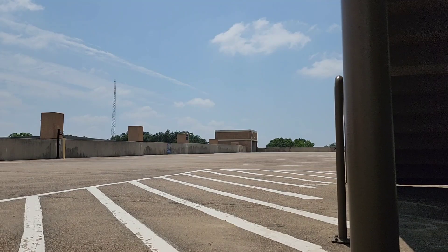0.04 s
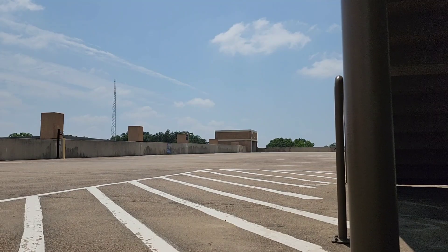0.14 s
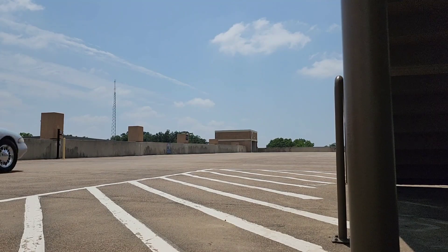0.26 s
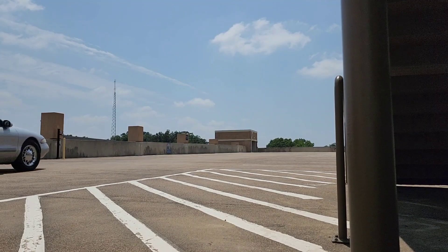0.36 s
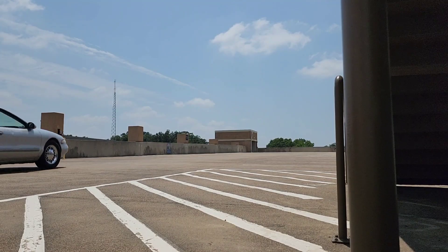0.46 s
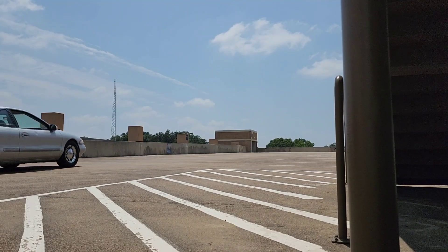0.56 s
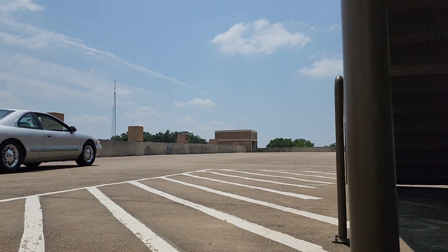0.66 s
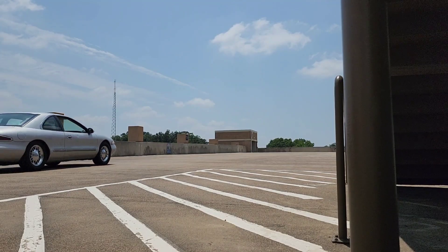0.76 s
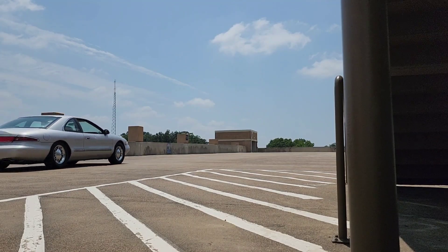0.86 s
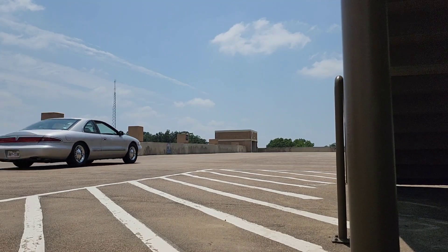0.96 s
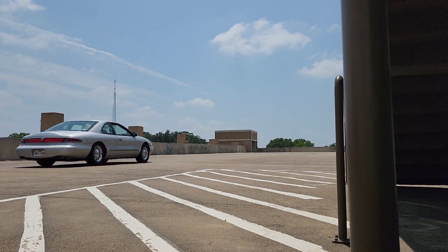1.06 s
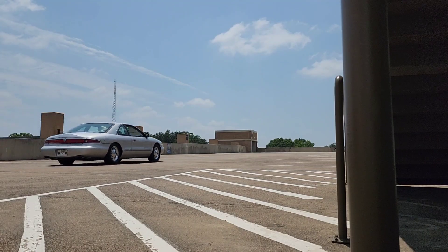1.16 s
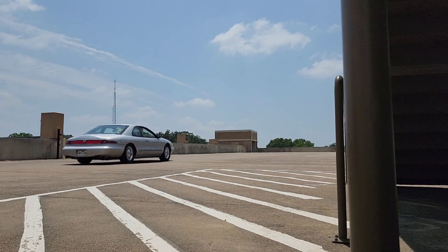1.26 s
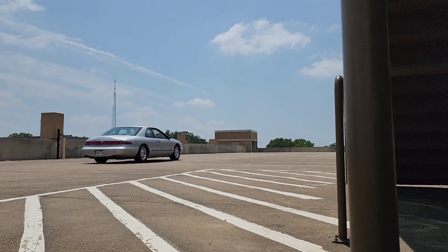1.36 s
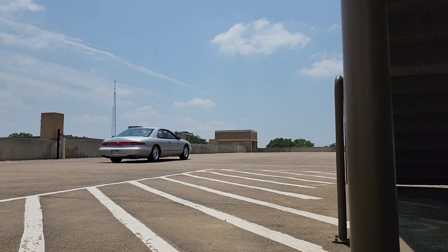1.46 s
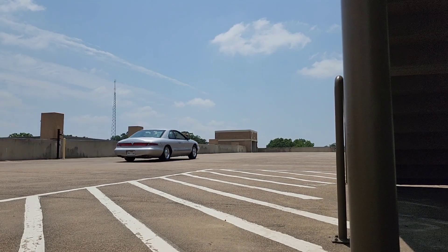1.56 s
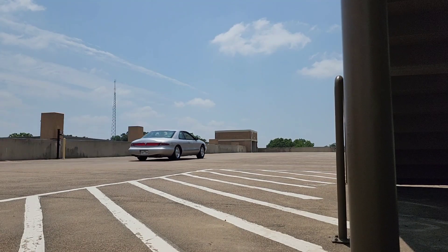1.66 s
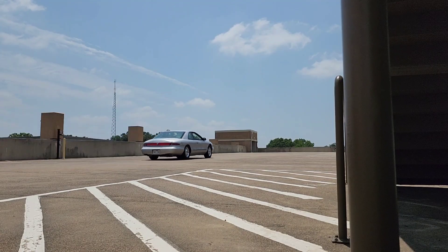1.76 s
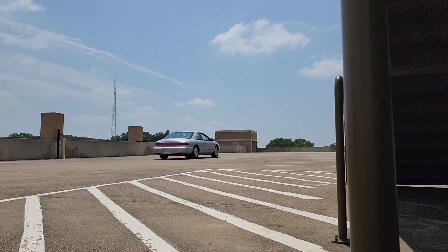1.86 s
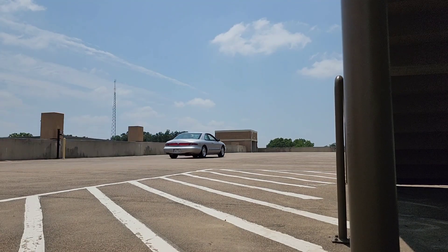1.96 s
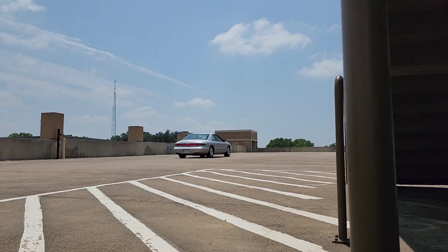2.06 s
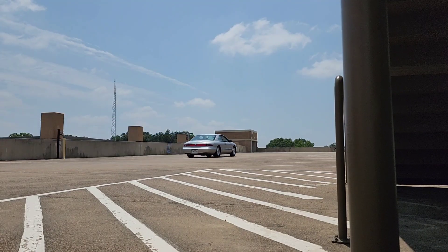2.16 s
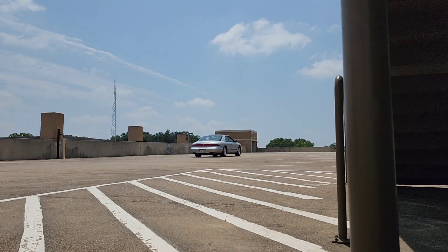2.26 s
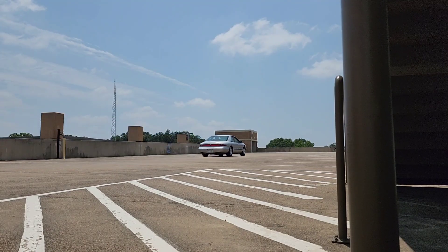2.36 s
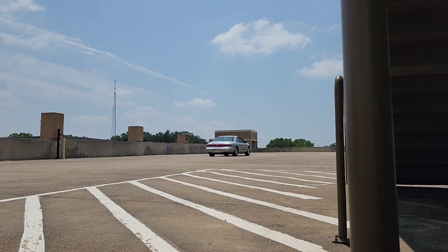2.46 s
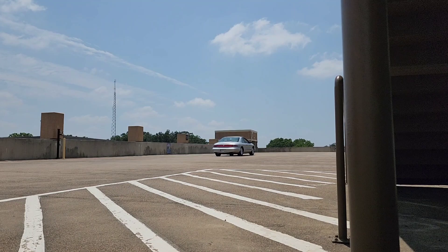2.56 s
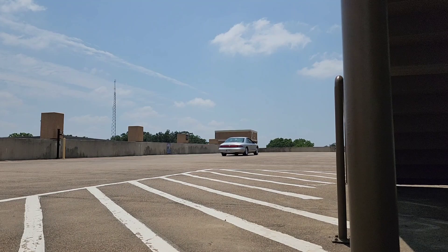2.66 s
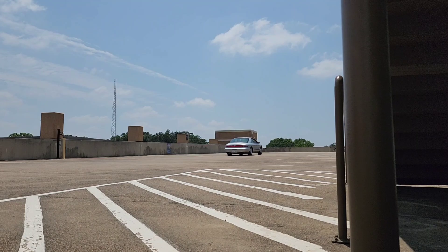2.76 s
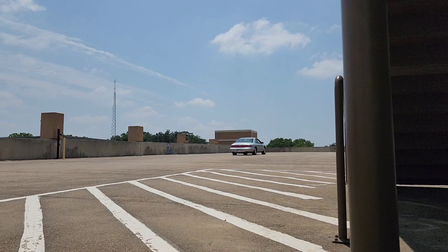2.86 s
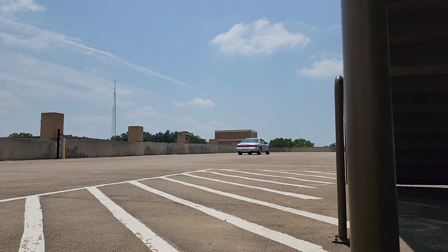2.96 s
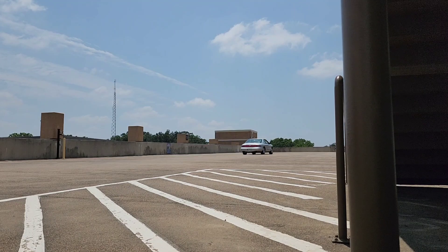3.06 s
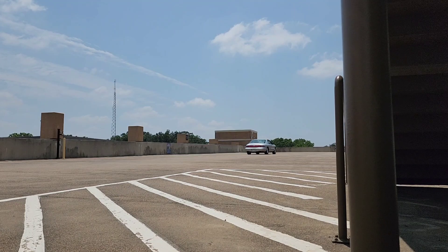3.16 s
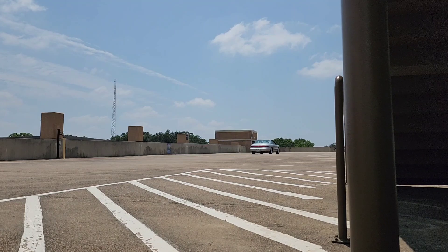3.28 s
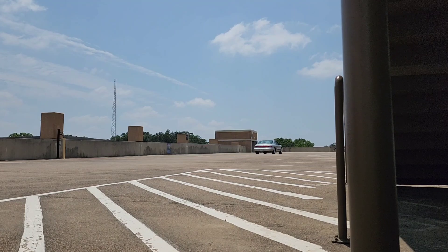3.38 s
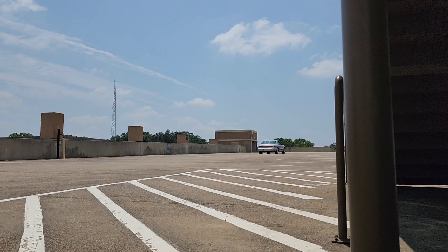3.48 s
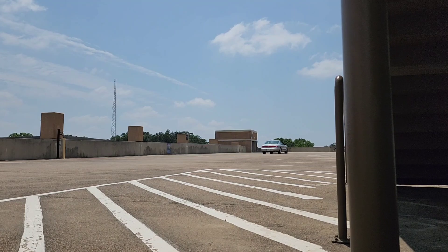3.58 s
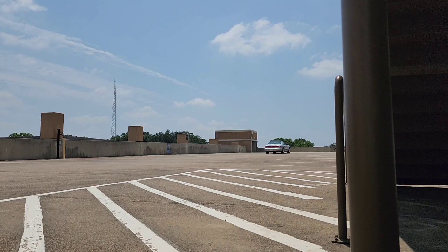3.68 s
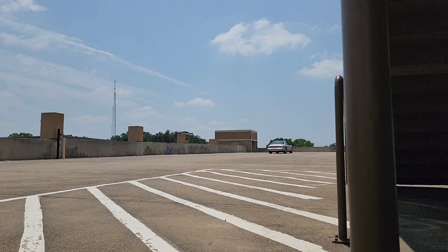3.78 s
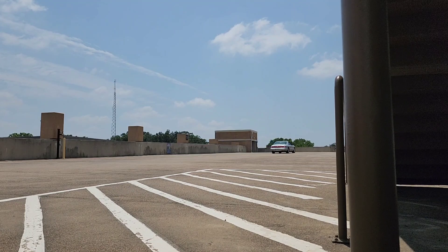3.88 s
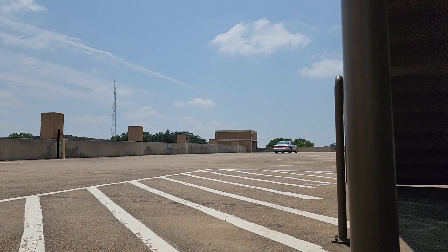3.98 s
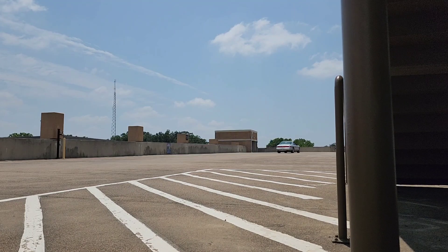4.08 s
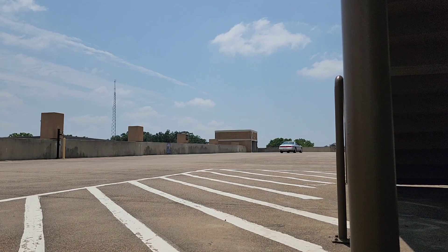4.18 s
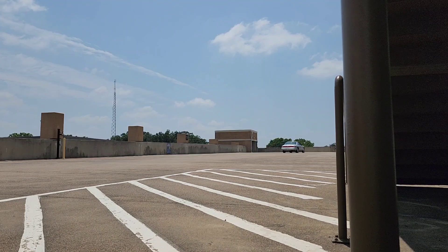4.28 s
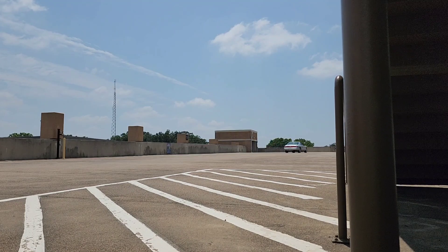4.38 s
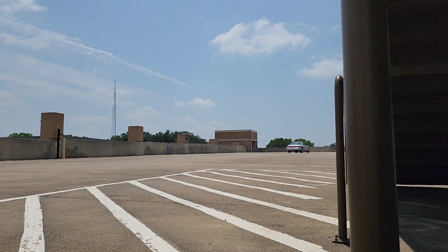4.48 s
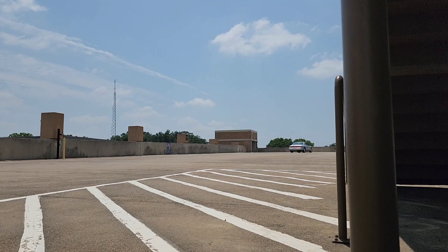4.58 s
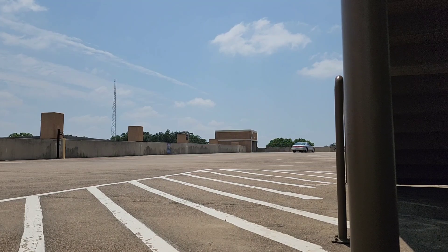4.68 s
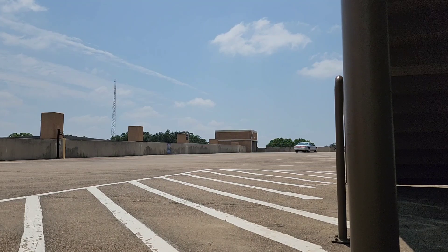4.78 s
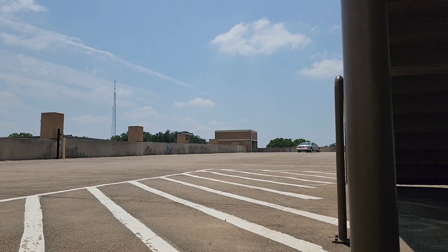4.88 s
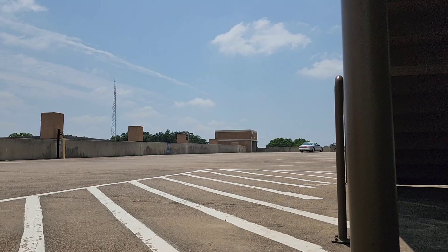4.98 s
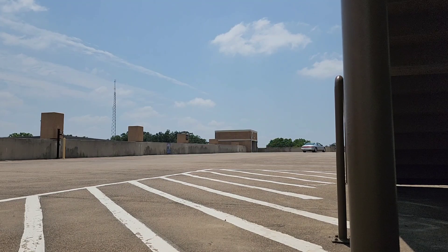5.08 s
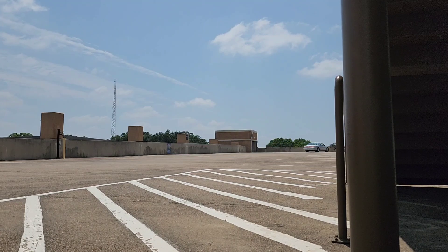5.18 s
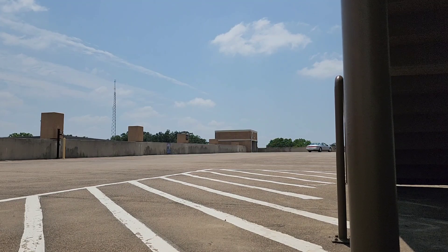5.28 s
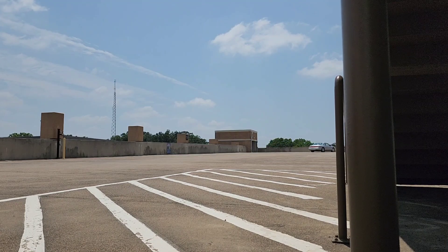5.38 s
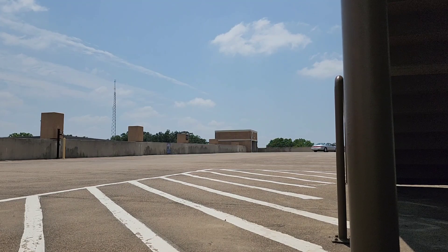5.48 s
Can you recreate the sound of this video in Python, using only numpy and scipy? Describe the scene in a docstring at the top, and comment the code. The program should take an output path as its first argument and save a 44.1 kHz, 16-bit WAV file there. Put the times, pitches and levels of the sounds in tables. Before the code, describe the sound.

A big-engined car accelerates past from the left with a throaty, booming roar, then eases off and fades away across an open concrete deck.

```python
"""A large V8 car pulls away across an open concrete deck, its revs rising, with small bright ticks from stones.
Each firing adds to a booming tone, its overtones and a rasp; noise in puffs makes the roar, steadier noise the hiss.
Early gusts add low rumbling noise that differs at the left and right microphones, and a wall answers on the right.
The driver lifts off, the revs fall and the car rolls away, fading and losing its top treble.
Town noise runs throughout; late on, a wavering low hum comes up and a far bird chips in short sliding whistles."""
import sys
import numpy as np
from scipy import signal
from scipy.fft import rfft, irfft, next_fast_len
from scipy.io import wavfile
from scipy.ndimage import uniform_filter1d, map_coordinates

SR = 44100
rng = np.random.default_rng(int(sys.argv[2]) if len(sys.argv) > 2 else 0)


def to_wav(sig):
    """Store sig (one row per channel, or 1-D mono) as 16-bit WAV at the path in sys.argv[1].

    Samples outside -1..1 are clipped; the rate is SR.
    """
    pcm = np.clip(np.atleast_2d(sig), -1, 1) * 32767
    pcm = np.round(pcm).astype(np.int16)
    wavfile.write(sys.argv[1], SR, pcm.T)  # frames by channels


N = 243851  # length in samples

# How often the engine fires: time_s, firing_rate_hz
FIRING_RATE = [(0, 133), (.5, 148.6), (.9, 165.1), (1.4, 181.8), (1.8, 190.4), (1.95, 189.5), (2.1, 181.8),
               (2.3, 175.5), (2.42, 170.4), (2.5, 160.6), (2.7, 151.4), (2.95, 147.3), (3.05, 149),
               (3.12, 143), (3.15, 132.5), (3.45, 120), (3.75, 115.9), (4.05, 110.8), (5.53, 90.1)]
# Firing tone, swelling and fading as echoes add and cancel: time_s, level_db
BOOM = [(0, -35), (.031, -19), (.108, -19.5), (.122, -22.5), (.137, -32.5), (.152, -24), (.172, -17.5),
        (.186, -26.5), (.197, -16.5), (.212, -13), (.224, -27), (.24, -17), (.258, -26), (.27, -30),
        (.285, -30.5), (.3, -32), (.32, -29), (.44, -25), (.64, -31), (.73, -22.5), (.82, -25.5),
        (.98, -21), (1.11, -22.5), (1.24, -16), (1.5, -19), (1.56, -15), (1.8, -25), (2.07, -20),
        (2.2, -24.5), (2.245, -39), (2.3, -20), (2.41, -37), (2.46, -25), (2.61, -39), (2.71, -31),
        (2.81, -45.5), (2.97, -33), (3.1, -47.5), (3.16, -28.5), (3.2, -35.5), (3.25, -25.5), (3.29, -29.5),
        (3.317, -47.5), (3.393, -30), (3.55, -45), (3.76, -36.5), (3.83, -43), (3.97, -44.5), (4.15, -55.5),
        (5.53, -91)]
# Multiples 2 to 5 of the firing rate: time_s, second_db, third_db, fourth_db, fifth_db
OVERTONES = [(0, -52, -46, -40, -47), (.2, -47, -37.5, -51, -32.5), (.33, -65.5, -37, -50, -35.5),
             (.48, -57, -47, -46, -35), (.55, -31.5, -49, -47, -40), (.65, -32, -45, -40, -33),
             (.72, -40.5, -33, -39, -53.5), (.85, -31.5, -32.5, -33, -40.5), (.97, -30.5, -49, -35, -38.5),
             (1.1, -33.5, -45.5, -25.5, -33.5), (1.21, -22.5, -43, -30, -45.5),
             (1.3, -29.5, -28.5, -24.5, -47), (1.41, -24.5, -33.5, -26, -43),
             (1.5, -35.5, -43.5, -37.5, -48), (1.7, -27, -46.5, -29, -53), (1.8, -34.5, -42, -39.5, -60),
             (2.0, -30, -39.5, -40, -54), (2.08, -31, -41, -31, -45), (2.2, -43.5, -41, -38, -44),
             (2.28, -26.5, -43, -25, -37), (2.33, -35.5, -37, -39.5, -43), (2.39, -28, -40.5, -41, -51),
             (2.45, -31, -38, -53, -52), (2.5, -40, -44, -48, -52.5), (2.7, -46, -57.5, -48, -48.5),
             (2.92, -43.5, -39, -58, -48), (3.04, -36, -61, -63, -52), (3.1, -43.5, -53, -58, -55),
             (3.14, -37.5, -50.5, -62, -50.5), (3.2, -54.5, -41.5, -62.5, -57),
             (3.5, -50, -57, -55.5, -55.5), (4, -62.5, -77, -75, -77)]
# Echoes break up the upper tones: time_s, phase_scatter_rad (for the third multiple)
PHASE_SCATTER = [(0, .6), (.45, .3), (.7, .12), (1.4, .15), (1.8, .45), (2.4, .4), (5.53, .6)]
# Strongest parts of the uneven beat: multiple_of_firing_rate, gain_db
BURBLE = [(.5, 2.5), (0.624, 3.5), (0.749, -6.5), (1.375, -11)]
# Strength of the whole uneven beat: time_s, gain_db
BURBLE_GAIN = [(0, -44.5), (.3, -47.5), (.55, -40.5), (.8, -36.5), (.95, -42), (1.2, -35), (1.4, -49.5),
               (1.75, -54.5), (1.95, -52), (2.2, -83), (2.9, -49.5), (3.1, -58), (3.6, -57.5)]
# Silencer resonances that lift a burble tone passing through: pitch_hz, half_width_hz, lift_db
SILENCER_LIFT = [(94, 8.9, 5.5), (189.2, 14, 25), (260.3, 9.8, 31)]
# Bite of the exhaust as the driver presses and lifts: time_s, gain_db
THROTTLE = [(0, -3), (.5, -1), (.8, 2), (1.4, 2), (2.2, 0), (2.5, -2), (2.9, -5), (3.3, -12), (5.53, -30)]
# Push of each cylinder above or below the mean: push (no unit)
CYLINDERS = [1, -.7, .6, -.3, .1, -.2, -.7, .2]
# Random part of each push: time_s, spread (no unit)
CHANCE_PUSH = [(0, .55), (.45, .35), (.6, .22), (1.4, .22), (1.6, .45), (2.5, .4), (5.53, .5)]
# Tailpipe tones rung by each firing: pitch_hz, width_hz, gain_db
TAILPIPE = [(258, 57.6, -4.5), (421, 113, -5.5), (609, 110, -1), (728, 130, -0.5), (860, 142.4, -4.5),
            (1055, 207, -14.5)]
# Short ringing bursts in the exhaust roar: start_s, start_gain_db, pitch_hz
RING_BURSTS = [(0.104, -23.5, 713), (0.166, -17.5, 410), (0.822, -24.5, 657), (0.872, -23, 606),
               (0.969, -25.5, 705), (1.138, -15, 713), (1.185, -10.5, 667), (1.837, -27, 604),
               (2.137, -13, 700), (2.243, -13, 718), (2.272, -15, 736), (2.289, -12.5, 428),
               (2.617, -35, 552), (2.638, -27.5, 870), (2.855, -25, 756), (3.153, -26, 693),
               (3.238, -34, 403), (3.303, -30.5, 680), (3.371, -28.5, 710)]
# The car's noise before each part's own trim: time_s, exhaust_roar_db, tyre_db, hiss_db
CAR_LEVELS = [(0, -29, -42, -40.5), (.21, -23, -32.5, -40), (.29, -28.5, -36.5, -42), (.71, -27, -41, -40),
              (1.26, -20.5, -32.5, -43), (1.42, -28, -36, -45), (2.3, -27.5, -39.5, -50),
              (2.59, -30.5, -44, -56), (2.99, -30, -49, -60), (3.11, -37, -49, -59),
              (3.71, -42, -49, -65.5), (3.95, -45.5, -49.5, -68), (4.12, -43.5, -51.5, -71.5),
              (4.22, -47, -52.5, -69.5), (4.32, -46, -52, -76.5), (4.6, -52, -52.5, -71.5),
              (4.95, -55.5, -58.5, -79), (5.53, -59.5, -65, -86)]
# Tone colour of the exhaust roar: pitch_hz, level_db_per_hz
PIPE_COLOUR = [(20, -68), (100, -7), (160, 5), (220, 0.5), (300, -10.5), (500, -4), (650, -2.5),
               (850, -7.5), (1100, -16.5), (1500, -22), (3000, -55.5), (9000, -120)]
# Silencer and deck resonances: pitch_hz, half_width_hz, gain_db
DRONE = [(100, 29, 3.5), (236, 110, -1), (257.4, 8.4, 2.5), (262, 4.7, -17), (415.3, 28, 6), (583, 22, -9),
         (749, 10.2, 2.5)]
# Strength of those resonances together: time_s, level_db
DRONE_LEVEL = [(0, -55), (.3, -45), (1, -42), (2.1, -36.5), (2.42, -38.5), (2.48, -32), (2.6, -39),
               (2.8, -36), (3, -37), (3.15, -46.5), (3.5, -60.5), (3.8, -68), (4.1, -59.5), (4.5, -62),
               (5.53, -75)]
# Patchiness of roar and tyres, evener when far: time_s, depth_db
PATCH_DEPTH = [(0, 2), (3, 2), (3.8, 1.6)]
# Tone colour of the hiss: pitch_hz, level_db_per_hz
HISS_COLOUR = [(1500, 2.5), (2400, 3), (3000, 0.5), (3600, -1.5), (5000, -8.5), (6200, -8.5), (8300, -9),
               (9800, -18), (14400, -19.5), (15700, -25)]
# Tone colour of the tyres: pitch_hz, level_db_per_hz
TYRE_COLOUR = [(400, -48), (900, 8), (1200, 4), (1450, 3), (1650, -2.5), (1820, -2.5), (2070, -5.5),
               (2200, -22), (2400, -7.5), (3000, -38.5), (6000, -120)]
# Strength of the narrow whistling bands: time_s, gain_db
WHINE_GAIN = [(0, -48), (.1, -50), (.19, -39.5), (.3, -50), (.4, -47), (.55, -45.5), (1.3, -51), (3, -84)]
# Those bands one by one: pitch_hz, gain_db
WHINE_BANDS = [(1800, -3.5), (2050, -9), (2350, -12.5)]
# Stones under the tyres: start_s, start_gain_db, pitch_hz, half_width_hz
GRIT = [(.334, -33, 5700, 1200), (.846, -38, 9500, 5500), (.86, -44, 11000, 5000), (.979, -42, 4000, 2000),
        (3.305, -55, 3200, 1200)]
# Direction of the car: time_s, left_lead_samples (how far the left side leads)
BEARING = [(0, 17), (.5, 11), (1, 8), (1.5, 4), (2.2, 0), (3.5, -3), (5.53, -5)]
# Wind gusts: peak_s, gain_db, half_length_s, left_over_right_db
GUSTS = [(0.102, -43, 0.059, -1.5), (0.195, -31.5, 0.044, -4.5), (0.249, -25.5, 0.013, -5.5),
         (1.162, -21.5, 0.036, -1), (1.234, -23, 0.046, 10.5), (1.628, -34, 0.048, -1),
         (3.152, -40.5, 0.041, -2), (5.271, -52.5, 0.04, 7)]
# Tone colour of the wind: pitch_hz, level_db_per_hz
WIND_COLOUR = [(15, -28.5), (30, -14.5), (50, -7), (80, -6.5), (150, -6), (230, -20.5), (300, -14.5),
               (600, -45), (2000, -120)]
# Tone colour of the town: pitch_hz, level_db_per_hz
TOWN_COLOUR = [(15, -35), (25, -6), (70, -1.5), (110, -5), (170, -15), (240, -11), (340, -20), (700, -27),
               (1700, -29), (2300, -37), (2700, -43.5), (3900, -41.5), (4400, -37.5), (4800, -47.5),
               (8300, -54), (9200, -73.5), (15700, -81.5)]
# How alike the town is on the two sides: pitch_hz, likeness (1 is the same)
TOWN_LIKENESS = [(60, 0.99), (180, 0.98), (550, 1), (900, 0.76), (1300, .35), (2000, .2), (4970, 0.063),
                 (15000, 0.46)]
# Low wavering note far off: time_s, pitch_hz, level_db
HUM = [(3.7, 71.34, -62.5), (4.0, 72.2, -41), (4.15, 69.17, -46.5), (4.4, 78.03, -41.5), (4.55, 81.06, -54),
       (4.8, 85.25, -51), (5.05, 85.6, -42), (5.16, 79, -57), (5.2, 50.4, -47), (5.3, 57, -49),
       (5.53, 79.7, -41.5)]
# Bird chips: start_s, gain_db, start_pitch_hz, end_pitch_hz, length_s
BIRD = [(5.081, -59, 6790, 5260, 0.0131), (5.136, -53, 6620, 5120, 0.014), (5.118, -70, 6250, 6200, .018),
        (5.146, -68, 5000, 4300, .008), (5.208, -67, 5755, 5400, 0.01), (5.254, -72, 5340, 5440, .016),
        (5.3, -69.5, 5600, 5310, .02), (5.351, -61, 5630, 6010, 0.011), (5.367, -63, 5730, 5370, .012),
        (5.376, -70, 5270, 4750, .009), (5.455, -71, 7880, 7380, 0.0091), (5.473, -75, 6465, 6080, 0.0073)]
# Stereo spread: pitch_hz, side_over_middle_db
WIDEN = [(300, 0), (700, -0.5), (1100, 1.5), (1500, 4.5), (2200, 1.5), (3500, 0)]
# Tone balance between the sides: pitch_hz, left_over_right_db
SIDE_TILT = [(100, .2), (700, .8), (1300, -2), (4000, -2), (8000, -5), (15000, -2.5)]

FLUTTER_DB, FLUTTER_PER_S = 2, 20  # most tones swell and fade on their own
MEAN_PUSH = .42  # mean push of a firing, no unit
ECHO_DB = 0  # the deck's answer to the pushes, over the direct ones
DIP_S, DIP_DEPTH = .009, .62  # the level dips briefly before each ringing burst
BREEZE_DB, BREEZE_DB_PER_S = -29.5, -7  # wind between the gusts, dying down
TOWN_DB = -41.5
TOP_HZ = 15700  # upper band limit


def amp(db):
    """Turns decibels into a plain gain."""
    return 10 ** (np.asarray(db) / 20)


def unit(x):
    """Scales a sound to an average (rms) strength of 1."""
    return x / np.sqrt(np.mean(x ** 2) + 1e-20)


def along(points, hz):
    """Reads a pitch table between its points, on a log pitch axis."""
    pitch_hz, value = np.transpose(points)
    return np.interp(np.log(hz + 1), np.log(pitch_hz + 1), value)


def curves(rows):
    """Draws each column after the time as a curve with one value per sample."""
    time_s, *columns = np.transpose(rows)
    return [np.interp(np.arange(N) / SR, time_s, column) for column in columns]


def wobble(rate):
    """A smooth random curve with the given number of random knots a second."""
    steps = np.arange(0, N + 32, 32)
    knots = rng.standard_normal(N // 100)
    return np.interp(np.arange(N), steps, map_coordinates(knots, [steps * rate / SR]))


def filtered(x, response):
    """Shapes a sound by multiplying its spectrum by a response to pitch."""
    m = next_fast_len(N + SR // 2)
    return irfft(rfft(x, m) * response(np.fft.rfftfreq(m, 1 / SR)), m)[..., :N]


def coloured(x, spectrum):
    """Gives a sound a tone colour from a table, at rms 1."""
    return unit(filtered(x, lambda hz: amp(along(spectrum, hz))))


def late(x, samples):
    """Delays a sound by a fixed or moving number of samples."""
    return map_coordinates(x, [np.arange(N) - samples], order=3, mode="nearest")


def smeared(x):
    """Blurs a sound into many close echoes, as off rough concrete, within 50 ms."""
    echoes = rng.standard_normal(SR // 20) * np.hanning(SR // 20)
    return signal.fftconvolve(x, echoes / np.linalg.norm(echoes))[:N]


def patchy(x):
    """Makes noise louder or softer at random in patches some 200 Hz by 80 ms."""
    _, time_s, spectrum = signal.stft(x, SR, nperseg=512)
    random_field = rng.standard_normal(spectrum.shape[1:])
    field = uniform_filter1d(uniform_filter1d(random_field, 2, 0), 14, 1)
    depth_db = np.interp(time_s, *np.transpose(PATCH_DEPTH))
    return signal.istft(spectrum * amp(depth_db * unit(field)), nperseg=512)[1][:, :N]


def car():
    """Direct sound from the car's direction, a wall's answer, and scattered sound unlike on the two sides."""
    turns = 2 * np.pi * np.cumsum(curves(FIRING_RATE)[0]) / SR  # firing phase, rad
    roar_db, tyre_db, hiss_db = curves(CAR_LEVELS)
    noise, *scattered = exhaust_roar(turns, roar_db) + hiss(turns, tyre_db, hiss_db)
    tones = exhaust_tones(turns, roar_db)
    upper = lambda hz: hz ** 4 / (hz ** 4 + 330 ** 4)

    wall = amp(-2.0) * filtered(smeared(tones + noise), lambda hz: hz ** 2 / (hz ** 2 + 450 ** 2))
    dip_gain = level_dips()
    bass_tones = filtered(tones, lambda hz: 1 - upper(hz))
    direct = dip_gain * (noise + filtered(tones, upper)) + bass_tones + ring_bursts()
    scattered = filtered(np.array(scattered), lambda hz: hz / (hz + 500))
    scattered = np.sqrt(dip_gain) * amp(4.5) * scattered
    # Tones crossing the deck sideways, opposite on the two sides
    across = amp(-7.5) * filtered(smeared(tones), lambda hz: hz ** 2 / (hz ** 2 + 130 ** 2))

    left = direct + late(wall, 21) + across  # the wall is heard on the right first
    # The bass shows no direction, so only the upper part is shifted in time
    shift = filtered(late(direct, curves(BEARING)[0]) - direct, upper)
    right = direct + shift + wall - across
    return np.array([left, right]) + scattered + whine() + grit()


def exhaust_tones(turns, roar_db):
    """Regular firings make a tone and overtones; unequal cylinders add a weaker, unsteady beat and a rasp."""
    tone = lambda k, db, phase=0: np.sqrt(2) * amp(db) * np.cos(k * turns + phase)
    flutter = lambda: FLUTTER_DB * wobble(FLUTTER_PER_S)
    rate_hz, scatter = curves(FIRING_RATE)[0], curves(PHASE_SCATTER)[0]

    steady = tone(1, curves(BOOM)[0])
    for k, db in enumerate(curves(OVERTONES), start=2):
        steady = steady + tone(k, db + flutter(), k / 3 * scatter * wobble(30))
    steady = steady * amp(1.0 * wobble(60))  # no two firings are equally strong

    lift = lambda f: sum(db / (1 + ((f - hz) / width) ** 2) for hz, width, db in SILENCER_LIFT)
    burble_db = curves(BURBLE_GAIN)[0]
    burble = sum(tone(k, burble_db + db + lift(k * rate_hz) + flutter()) for k, db in BURBLE)
    return steady + burble + amp(roar_db - 3 + curves(THROTTLE)[0]) * rasp(turns)


def rasp(turns):
    """One sharp push per firing, uneven by cylinder and by chance, rings the tailpipe."""
    firing = np.arange(1, int(turns[-1] / (2 * np.pi)) - 1)
    at = np.interp(firing * 2 * np.pi, turns, np.arange(N))
    luck = rng.standard_normal((len(firing), 2))
    at = np.clip(at + 3 * luck[:, 0], 0, N - 1).round().astype(int)  # timing jitter in samples
    chance = curves(CHANCE_PUSH)[0][at] * luck[:, 1]
    size = MEAN_PUSH + np.take(CYLINDERS, firing, mode="wrap") + chance
    pushes = np.bincount(at, size, N)

    def ring(f):
        """Adds up the tailpipe resonances, with every other one upside down."""
        return sum((-1) ** k * amp(db) * 1j * f * width / (hz * hz - f * f + 1j * f * width)
                   for k, (hz, width, db) in enumerate(TAILPIPE))

    return unit(filtered(pushes + amp(ECHO_DB) * smeared(pushes), ring))


def ring_bursts():
    """Short ringing bursts in the exhaust roar: each bursts in fast and rings down at one pitch."""
    out, t = np.zeros(N), np.arange(SR // 20) / SR
    for start_s, db, hz in RING_BURSTS:
        ring = (1 - np.exp(-t / .0003)) * np.sin(2 * np.pi * hz * t)
        out[round(start_s * SR):][:len(t)] += amp(db - 60 * t / .03) * ring  # falls 60 dB in 30 ms
    return out


def level_dips():
    """The upper exhaust sound and roar dip for a few milliseconds before each ringing burst."""
    t = np.arange(N) / SR
    dips = sum(np.clip(1 - ((t - s + DIP_S / 2) / DIP_S * 2) ** 4, 0, 1) for s, *_ in RING_BURSTS)
    return 1 - DIP_DEPTH * np.minimum(1, dips)


def exhaust_roar(turns, roar_db):
    """Turbulent gas leaves in one puff per firing, of uneven size, through pipe and silencer."""
    puff_gain = (1 + 0.33 * np.cos(turns)) * amp(0.34 * wobble(70) + 0.49 * wobble(3.4))
    puffs = puff_gain * patchy(rng.standard_normal((3, N)))
    modes = lambda f: sum(amp(db) / (1 + ((f - hz) / width) ** 4) for hz, width, db in DRONE)
    # On the throttle the tones lead, off it the noise
    share_db = -9 - np.maximum(curves(THROTTLE)[0], -10) / 2
    roar = amp(roar_db + share_db) * coloured(puffs, PIPE_COLOUR)
    return roar + amp(curves(DRONE_LEVEL)[0]) * unit(filtered(puffs, modes))


def hiss(turns, tyre_db, hiss_db):
    """Tyres, fan and valve gear: broad noise, lightly chopped by the firings, duller when far."""
    def chopped():
        """Noise that swells slightly with each firing and wavers a little."""
        gain = (1 + 0.046 * np.cos(turns)) * amp(0.9 * wobble(29.9) + 0.071 * wobble(8.7))
        return gain * rng.standard_normal((3, N))

    near = coloured(chopped(), HISS_COLOUR)
    dull = filtered(near, lambda hz: 1 / (1 + (hz / 8600) ** 14))
    # Air takes the top treble as the car recedes: 0 is near, 1 is far
    far = np.clip((np.arange(N) / SR - 1.1) / 2.4, 0, 1) ** 1.1
    broad = amp(hiss_db - 3.0) * ((1 - far) * near + far * dull)
    tyre_gain = amp(tyre_db - 5.0 + 1.4 * wobble(6.7))
    return broad + tyre_gain * coloured(patchy(chopped()), TYRE_COLOUR)


def whine():
    """Fuzzy whistles in the hiss while the car is near: steady tones with randomly wavering strength."""
    t = np.arange(N) / SR
    bands = sum(amp(db) * unit(wobble(130)) * np.sqrt(2) * np.sin(2 * np.pi * hz * t)
                for hz, db in WHINE_BANDS)
    return amp(curves(WHINE_GAIN)[0]) * bands


def grit():
    """Stones under the tyres tick: short bright bursts of noise around one pitch."""
    out, t = np.zeros(N), np.arange(400) / SR
    f = np.fft.rfftfreq(len(t), 1 / SR)
    for start_s, db, hz, width_hz in GRIT:
        spectrum = rfft(rng.standard_normal(len(t))) / (1 + ((f - hz) / width_hz) ** 4)
        burst = unit(irfft(spectrum, len(t)))
        out[round(start_s * SR):][:len(t)] += amp(db - 1 - 60 * t / .03) * burst
    return out


def gusts():
    """Wind buffets the two microphones with low noise, partly together and partly each on its own."""
    strength = amp(BREEZE_DB + BREEZE_DB_PER_S * np.arange(N) / SR)
    for peak_s, db, half_s, lean_db in GUSTS:
        shape = np.exp(-((np.arange(N) / SR - peak_s) / half_s) ** 4)
        strength = strength + amp([[db + lean_db / 2], [db - lean_db / 2]]) * shape
    lumps = amp(2.5 * np.array([wobble(20), wobble(20), wobble(20)]))
    shared, *own = coloured(lumps * rng.standard_normal((3, N)), WIND_COLOUR)
    return strength * (shared + 0.65 * np.array(own))


def town():
    """Far traffic and air: noise alike on both sides in the bass, less alike in the treble."""
    def middle_and_side(hz):
        """Splits the noise so that the two sides get the wanted likeness."""
        turn = np.arccos(np.clip(along(TOWN_LIKENESS, hz), -1, 1)) / 2
        return amp(along(TOWN_COLOUR, hz)) * np.array([np.cos(turn), np.sin(turn)])

    mid, side = filtered(rng.standard_normal((2, N)), middle_and_side)
    return amp(TOWN_DB + 0.92 * wobble(7.8)) * np.array([mid + side, mid - side]) / np.std(mid)


def hum():
    """An unsteady low note with wandering pitch and strength, the same on both sides."""
    hz, db = curves(HUM)
    phase = 2 * np.pi * np.cumsum(hz) / SR + 0.7 * wobble(20)
    return np.sqrt(2) * amp(db + 3.1 * wobble(14)) * np.cos(phase)


def bird():
    """Short whistles that slide in pitch, louder on the right, with a soft echo."""
    out = np.zeros(N)
    for start_s, db, start_hz, end_hz, length_s in BIRD:
        n = round(length_s * SR)
        phase = 2 * np.pi * np.cumsum(np.linspace(start_hz, end_hz, n)) / SR
        out[round(start_s * SR):][:n] += amp(db) * np.hanning(n) * np.sin(phase)
    out = out * amp(3 * wobble(400))  # a little hoarse
    return (out + amp(-13) * smeared(out)) * amp([[-2.5], [1.5]])


def scene():
    """Adds everything heard at the left and right microphones."""
    return car() + gusts() + town() + hum() + bird()


def record(dry):
    """Spreads the middle pitches wide, tilts the treble to the right and cuts the lowest and highest pitches."""
    ending = np.minimum(1, np.arange(N)[::-1] / 200)  # closes without a click
    mid_side = np.array([dry[0] + dry[1], dry[0] - dry[1]]) / 2
    mid, side = filtered(mid_side, lambda hz: amp(along(WIDEN, hz) * [[-.5], [.5]]))

    def balance(hz):
        """Left and right gain, with nothing below 12 Hz or above the band limit."""
        return amp(along(SIDE_TILT, hz) * [[.5], [-.5]]) * (hz < TOP_HZ) * (hz > 12)

    return filtered(np.array([mid + side, mid - side]) * ending, balance)


dry = scene()
out = record(dry)
to_wav(out)
```